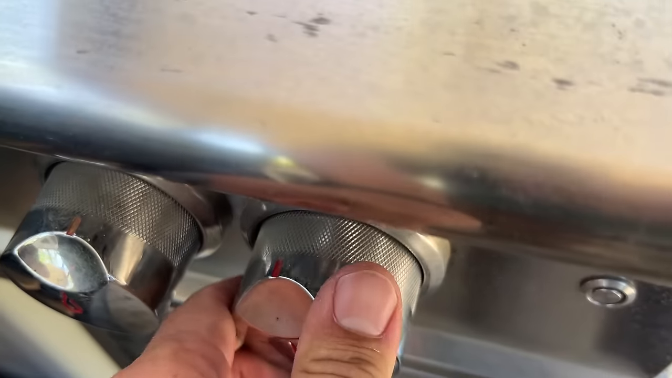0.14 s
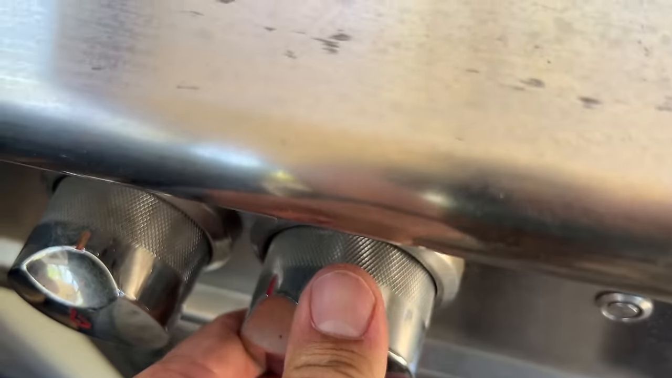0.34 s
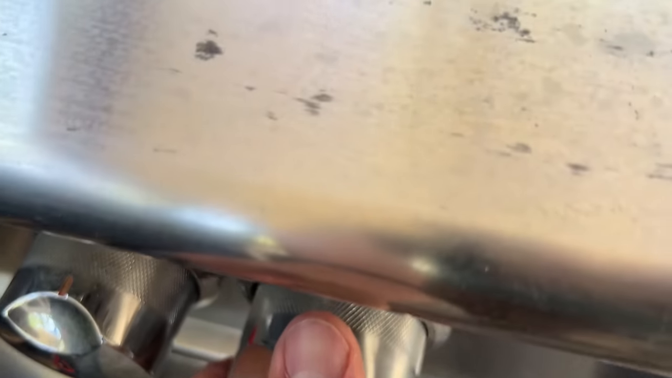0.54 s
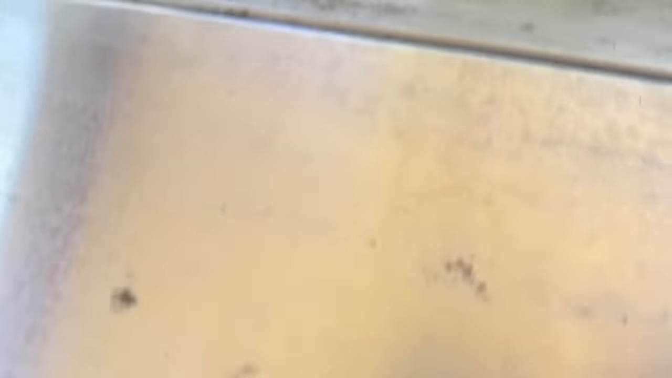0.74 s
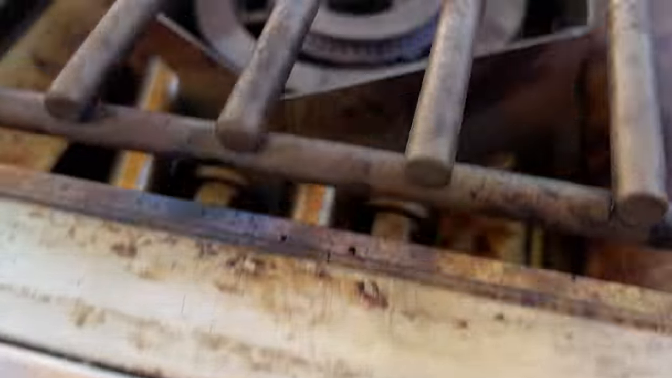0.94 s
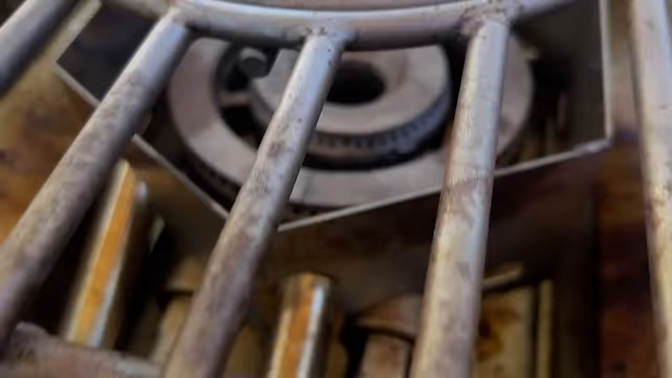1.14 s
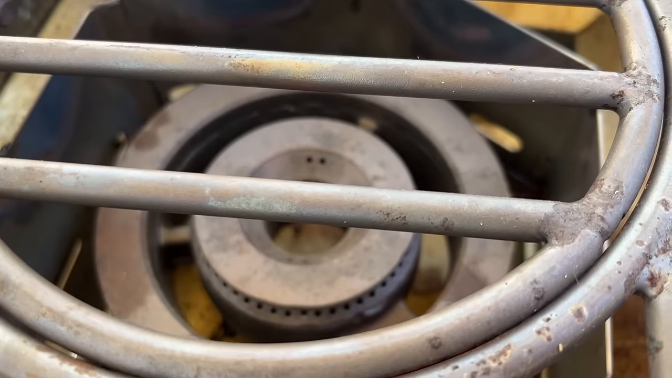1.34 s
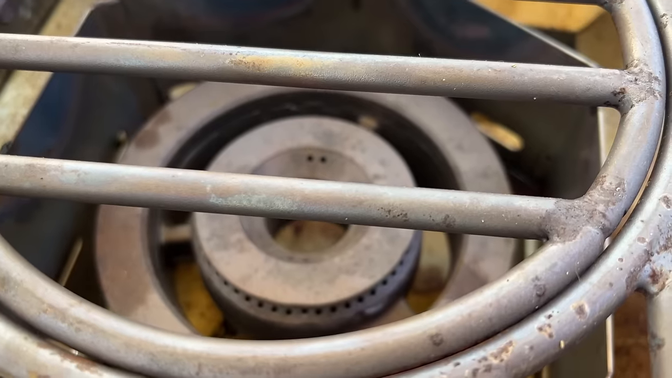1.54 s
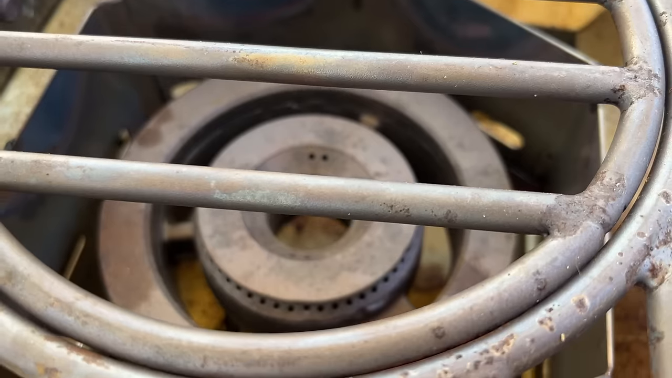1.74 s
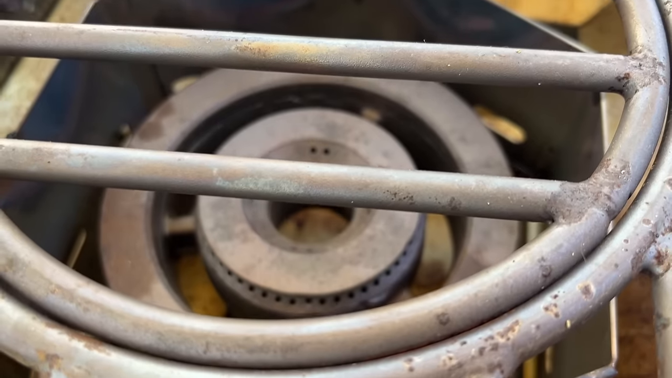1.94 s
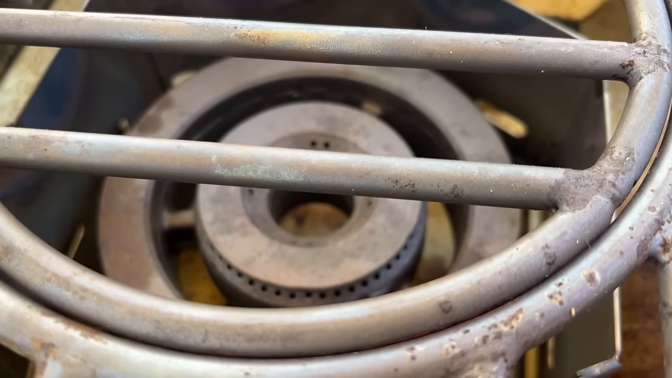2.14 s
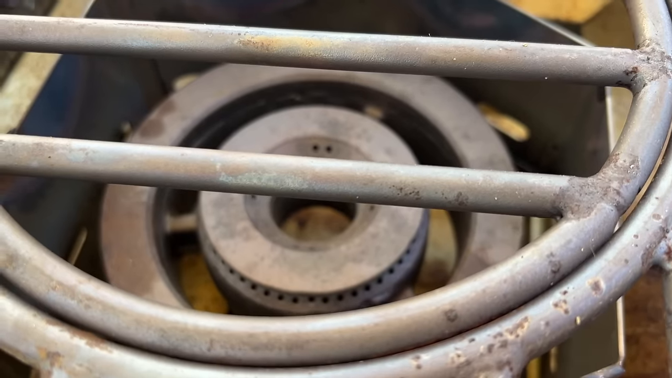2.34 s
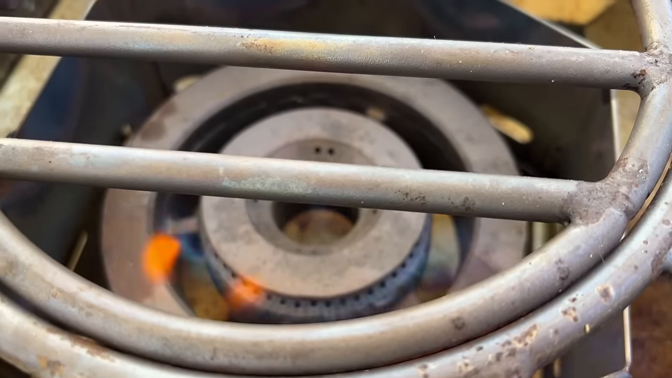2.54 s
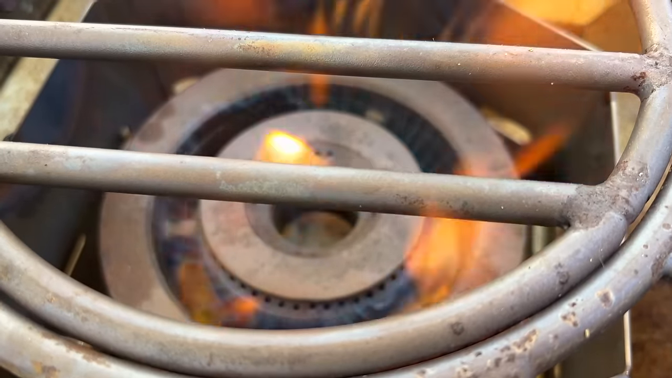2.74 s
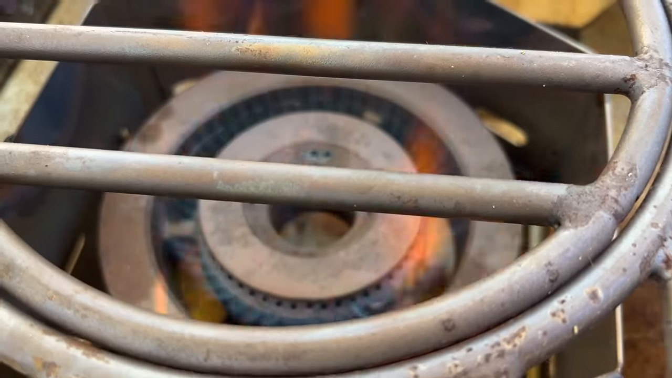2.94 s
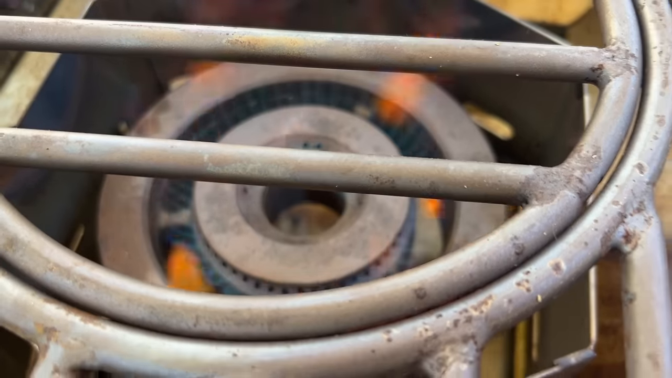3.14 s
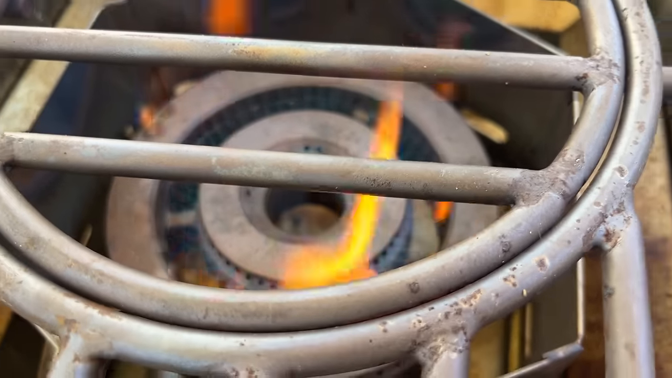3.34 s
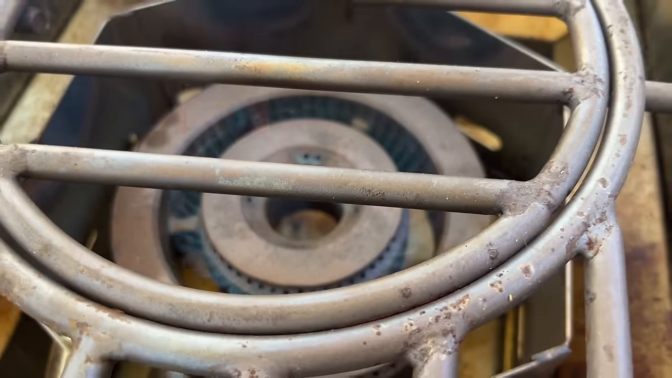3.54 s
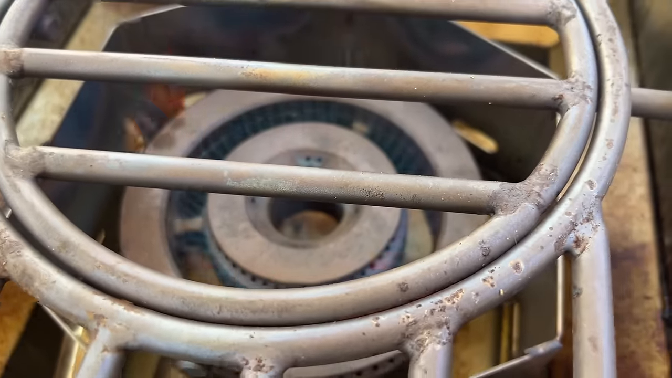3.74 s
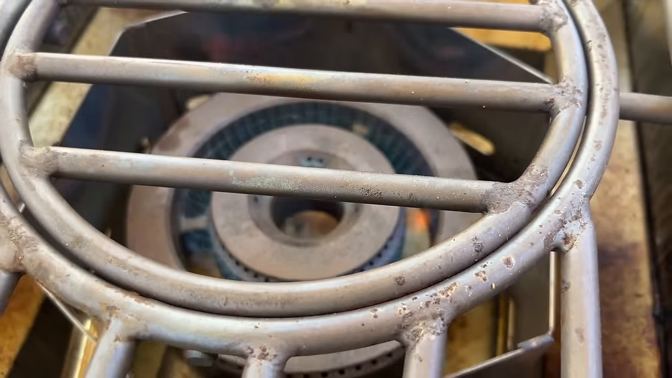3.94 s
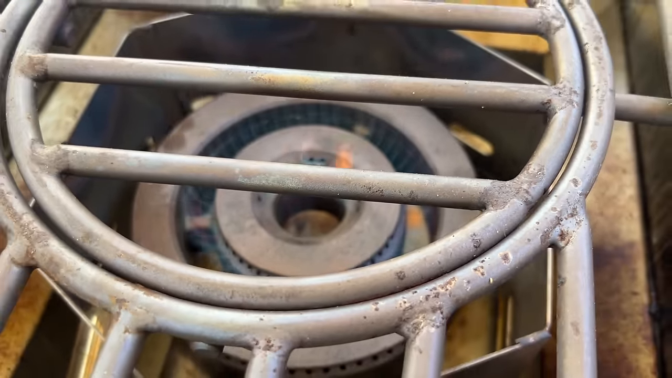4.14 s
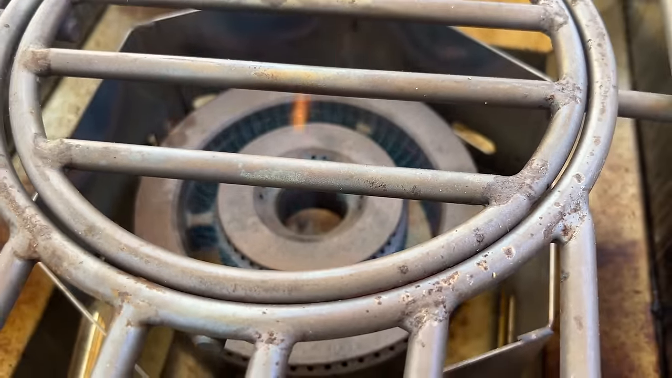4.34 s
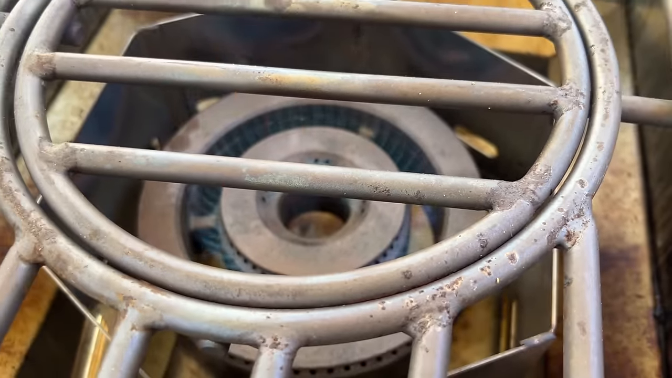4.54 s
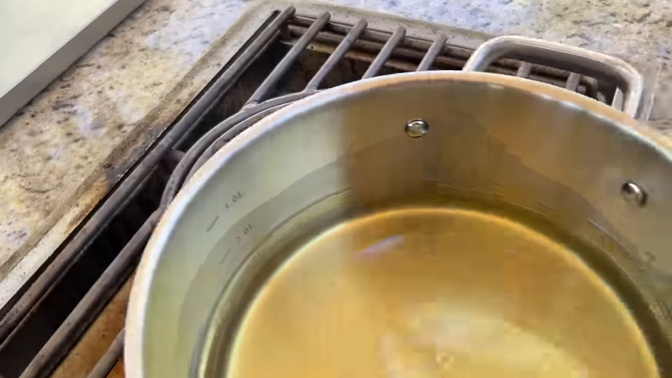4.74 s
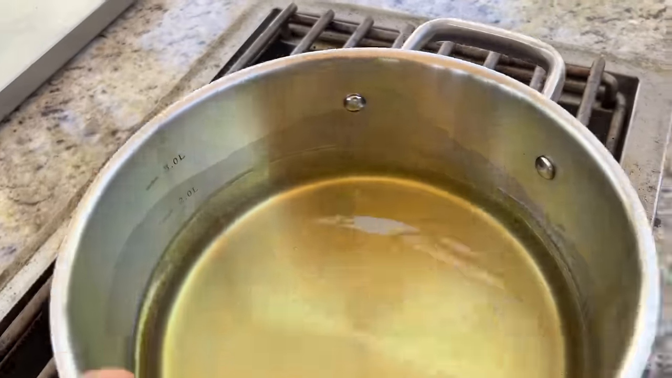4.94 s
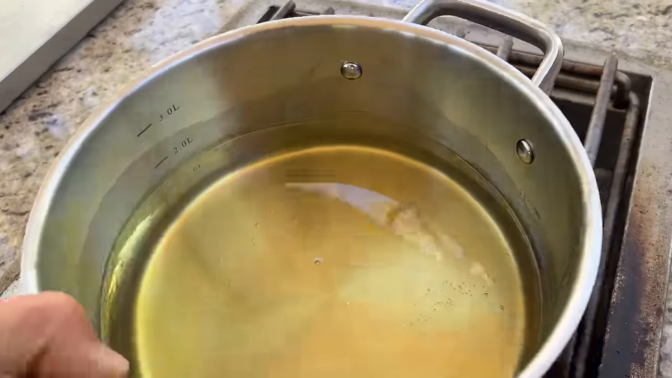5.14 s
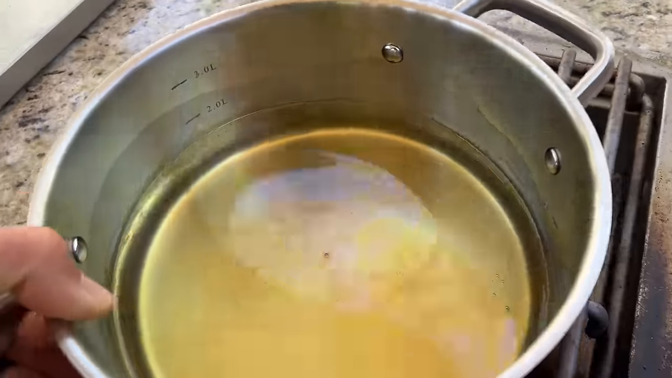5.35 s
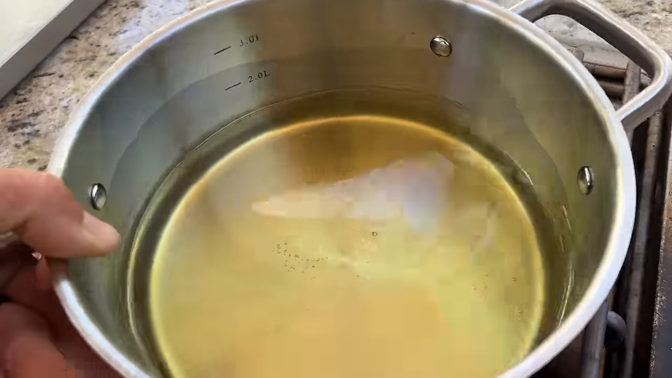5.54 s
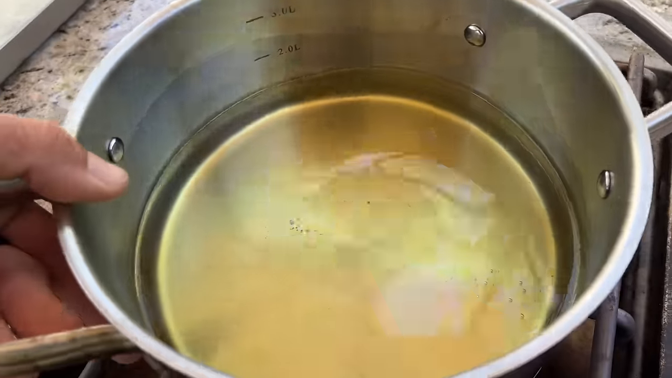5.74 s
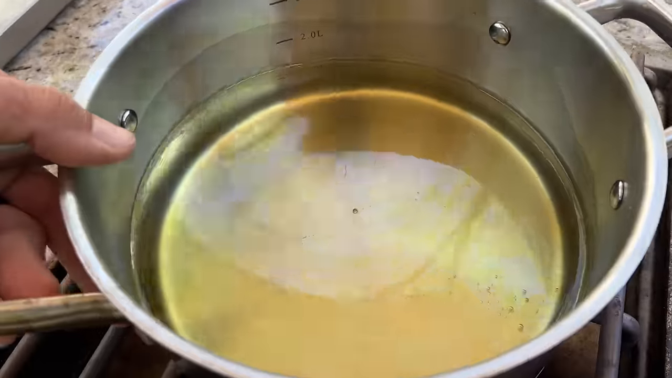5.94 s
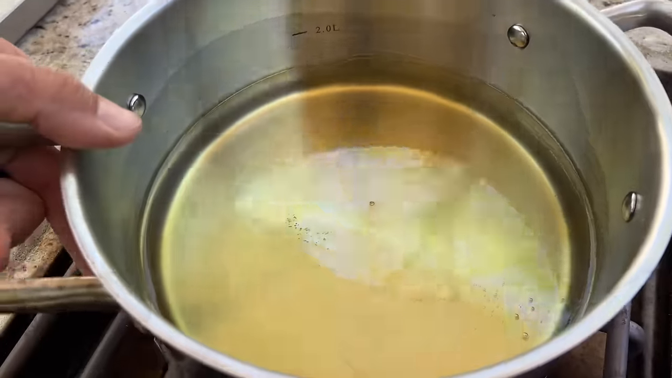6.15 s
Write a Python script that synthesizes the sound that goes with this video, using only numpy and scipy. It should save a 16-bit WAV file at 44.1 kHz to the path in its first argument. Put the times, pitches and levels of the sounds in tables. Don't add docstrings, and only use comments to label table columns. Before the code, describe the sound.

Stereo phone microphones sit near a steel grill in a quiet yard. Soft knob taps give way to thin valve hiss, firm panel knocks and spring clicks. The igniter cracks, pooled gas goes off in a double whoomp, and a low uneven flame roar follows with small puffs. Then a pot hits the grate twice, drags grittily with short metallic squeals, and rests above the burning gas.

```python
import sys
import numpy as np
from scipy import signal
from scipy.fft import rfft, irfft, next_fast_len
from scipy.io import wavfile
from scipy.ndimage import uniform_filter1d, map_coordinates

SR = 44100
rng = np.random.default_rng(int(sys.argv[2]) if len(sys.argv) > 2 else 0)


def transcribe(u):
    v = np.clip(np.atleast_2d(u).T, -1, 1)
    q = np.round(v * 32767).astype(np.int16)
    wavfile.write(sys.argv[1], SR, q)


def linear_from_db(decibels):
    return 10 ** (np.asarray(decibels, float) / 20)


N = 273711

# frequency in Hz, level in dB.
HISS = [(1000, -10), (2500, 0), (4500, -1.5), (7000, -7), (9000, -9.5), (12000, -15), (15600, -29),
        (16300, -49)]
COVERED_S = (4.9, 5.1)


def unit(x):
    return x / np.sqrt(np.mean(x ** 2) + 1e-20)


def along(points, hz):
    f, v = np.transpose(points)
    return np.interp(np.log(hz + 1), np.log(f + 1), v)


def curve(rows):
    s, value = np.transpose(rows)
    return np.interp(np.arange(N) / SR, s, value)


def ramp(span):
    return np.interp(np.arange(N) / SR, span, (0, 1))


def gate(start, end, fade):
    t = np.arange(N) / SR
    return np.clip(np.minimum(t - start, end - t) / fade, 0, 1)


def swells(rows):
    t = np.arange(0, N / SR + .001, .001)
    power = 0
    for s, db, rise, fall in rows:
        power = power + linear_from_db(2 * (db - np.maximum(rise * (s - t), fall * (t - s))))
    return np.interp(np.arange(N) / SR, t, power)


def wobble(rate, size=N):
    knots = rng.standard_normal(int(N * rate / SR) + 4)
    return map_coordinates(knots, [np.arange(size) * rate / SR])


def filtered(x, response):
    n = x.shape[-1]
    m = next_fast_len(n + 4096)
    return irfft(rfft(x, m) * response(np.fft.rfftfreq(m, 1 / SR)), m)[..., :n]


def resonance(f, hz, width_hz):
    return 1j * f * width_hz / (hz * hz - f * f + 1j * f * width_hz)


def touched(f, modes, width_hz, spread):
    return sum((-1) ** k * linear_from_db(level) * resonance(f, hz, width_hz + spread * hz)
               for k, (hz, level, _) in enumerate(modes))


def rush(response, patchy_db):
    z = signal.stft(rng.standard_normal((2, N)), nperseg=512)[2]
    field = uniform_filter1d(rng.standard_normal(z.shape[1:]), size=5, axis=0)
    field = unit(uniform_filter1d(field, size=8, axis=1))
    noise = signal.istft(z * linear_from_db(patchy_db * field), nperseg=512)[1][:, :N]
    return unit(filtered(noise, response))


def blows(hits, modes, damped_hz, spread, kick, floor_hz):
    out, t = np.zeros((2, N + SR)), np.arange(SR // 3) / SR

    def early(x):
        return x / np.sqrt(np.mean(x[:, :SR // 50] ** 2))

    for s, db, top_hz, rattle, ring_db in hits:
        low_hz = floor_hz * (top_hz / 1000) ** 0.29

        def contact(f):
            return (1j * f / low_hz / (1 + 1j * f / low_hz)) ** 2 / (1 + 1j * f / top_hz) ** 3

        noise = rng.standard_normal((2, len(t)))
        force = noise * (linear_from_db(-330 * t) / (1 + (t / rattle) ** 10) + 0.8 * linear_from_db(-60 * t / 0.12))
        force[:, 0] = kick
        rumble = filtered(.5 * noise[::-1] * linear_from_db(-60 * t / 0.62), lambda f: 1 / (1 + 1j * f / 700) ** 2)
        ring = 0
        for k, (hz, level, t60) in enumerate(modes):
            strength_db = level + rng.normal(0, 3, (2, 1))
            ring = ring + (-1) ** k * linear_from_db(strength_db - 60 * t / t60) * np.sin(2 * np.pi * hz * t)
        ring = signal.fftconvolve(noise * linear_from_db(-60 * t / 0.068), ring, axes=1)[:, :len(t)]
        held = filtered(force + rumble, lambda f: touched(f, modes, damped_hz, spread) * contact(f))
        sound = early(held) + linear_from_db(ring_db) * early(filtered(ring, contact))
        out[:, round(s * SR):][:, :len(t)] += linear_from_db(db) * sound
    return out[:, :N]


def whistles(rows, width_hz, fade, steady, dies=0):
    out, t = np.zeros((2, N)), np.arange(SR * 2 // 3) / SR
    for start, end, hz, db in rows:
        part = slice(round(start * SR), round(start * SR) + len(t))
        line = filtered(rng.standard_normal((2, len(t))), lambda f: resonance(f, hz, width_hz) ** 2)
        line = line / np.abs(signal.hilbert(line)) ** steady
        out[:, part] += linear_from_db(db - dies * t) * gate(start, end, fade)[part] * unit(line)
    return out


def yard():
    # frequency in Hz, level in dB.
    hum_colour = [(30, -27), (60, -6), (200, -2), (600, -1.5), (1200, -2.5), (2200, -8), (3500, -16),
                  (6000, -41)]
    # peak in seconds, level in dB, rise in dB/s, fall in dB/s.
    mutter = [
        (0.0, -47, 100, 33),
        (1.7, -40, 50, 104),
        (1.91, -47.5, 60, 63),
    ]
    # peak in seconds, level in dB, rise in dB/s, fall in dB/s.
    handling = [
        (0.0, -48, 100, 56),
        (0.25, -59, 20, 80),
        (1.05, -65, 40, 25),
        (1.8, -52, 50, 52),
        (2.63, -44, 130, 23),
        (4.96, -41, 220, 17),
        (5.8, -50, 33, 60),
        (6.2, -48, 70, 48),
    ]
    sinking = ramp((1.1, 1.56))
    level = np.sqrt(linear_from_db(2 * (-44.5 - 2 * sinking)) + swells(mutter))
    hum = level * linear_from_db(2 + 0.66 * wobble(6.26)) * rush(lambda f: linear_from_db(along(hum_colour, f)), patchy_db=1.44)

    pot_released = gate(5.42, 7, 0.074)
    held = swells(handling[:-2]) * (1 - pot_released) + swells(handling[-2:])
    warm_air = linear_from_db(2 * -56.5) * (gate(2.7, 4.5, .2) + ramp(COVERED_S))
    shake = np.sqrt(linear_from_db(2 * -79) + held + warm_air)
    rumble = shake * linear_from_db(1.5) * rush(lambda f: resonance(f, 58, 61) ** 3, patchy_db=-1.5)

    raw_gas = ramp((1.88, 2.39))
    hiss_db = -52 - 2 * sinking + 4 * raw_gas
    hiss = linear_from_db(hiss_db + 0.5 + 0.59 * wobble(6.14)) * rush(lambda f: linear_from_db(along(HISS, f)), patchy_db=3.0)
    return hum + rumble + hiss


def knob():
    # start in seconds, level in dB, contact top in Hz, rattle in seconds, relative ring-on in dB.
    knocks = [
        (.002, -33.5, 860, 0.035, -2),
        (.065, -40, 600, 0.037, -6),
        (1.4245, -29, 1810, 0.011, -7.5),
        (1.524, -31.5, 222, .03, -4.5),
        (1.62, -11, 2160, 0.021, -14),
        (1.7955, -25.5, 780, 0.016, -5.5),
    ]
    # frequency in Hz, level in dB, t60 in seconds.
    panel = [(172.6, -9, 0.98), (220.6, -8, 0.65), (290.4, -7, 0.82), (342, -3, 0.38), (443, -10, 0.19),
             (600, -5.5, 0.32), (774, -2, 0.13), (824, 1, 0.11), (970, -6, 0.22), (1165, -10.5, 0.26),
             (1575, -9, 0.17), (1935, -8.5, 0.2), (2350, -14.5, 0.14), (2690, -9.5, 0.16), (3280, -10, .08),
             (3580, -10, .08), (4840, -18, .15)]
    # start in seconds, end in seconds, frequency in Hz, level in dB.
    panel_hum = [
        (1.66, 1.8, 1935, -45.5),
    ]
    struck = blows(knocks, panel, damped_hz=67.4, spread=0.04, kick=17.8, floor_hz=287)
    return struck + whistles(panel_hum, width_hz=40, fade=.02, steady=.6, dies=30)


def valve():
    # start in seconds, end in seconds, frequency in Hz, level in dB.
    leak = [
        (0.81, 1.2, 4400, -58),
    ]
    jet = [
        (1.1, 1.37, 9300, -60),
        (2.13, 1.9, 11000, -59),
        (2.75, 2.9, 7550, -61.5),
    ]
    return whistles(jet, width_hz=59, fade=.03, steady=0.51) + whistles(leak, width_hz=590, fade=.08, steady=0)


def igniter():
    # peak in seconds, level in dB, rise in seconds, lowest Hz, highest Hz.
    snaps = [
        (1.388, -50, 0.0056, 3020, 8900),
        (1.4712, -16.5, 0.00035, 3380, 17000),
        (1.622, -31, .001, 2980, 7000),
        (1.797, -49, .002, 3000, 15000),
        (1.898, -41, 0.0036, 1490, 6800),
        (2.413, -15.5, 0.0026, 2500, 17000),
        (4.69, -47, .01, 6000, 16000),
        (4.85, -46.5, 0.018, 8000, 16000),
    ]
    # start in seconds, level in dB, contact top in Hz, rattle in seconds, relative ring-on in dB.
    striker = [
        (2.4055, -27, 4500, 0.0091, -11),
        (2.4125, -15, 7000, 0.034, -8),
    ]
    # frequency in Hz, level in dB, t60 in seconds.
    housing = [(638, -4, .08), (915, -4.5, .1), (1120, -5.5, 0.18), (1617, -0.5, 0.15), (1970, -5, 0.19),
               (2220, -10, 0.08), (2590, -4, .08), (3140, -3.5, .08), (3550, -8, 0.07),
               (4400, -13.5, 0.095), (5800, -25, 0.11)]
    lead_s = .05
    out, t = np.zeros((2, N)), np.arange(SR // 2) / SR - lead_s
    for s, db, rise, low_hz, high_hz in snaps:
        t60 = 0.065 * (1 + (rise / .006) ** 2)
        onset = np.exp(np.minimum(t, 0) / rise)
        decay = 0.8 * linear_from_db(-60 * t / t60) + 0.11 * linear_from_db(-25 * t / t60)
        shape = np.where(t < 0, onset, decay)

        def band(f):
            return (1j * f / low_hz / (1 + 1j * f / low_hz)) ** 3 / (1 + 1j * f / high_hz) ** 2

        burst = unit(filtered(rng.standard_normal((2, len(t))), band))
        out[:, round((s - lead_s) * SR):][:, :len(t)] += linear_from_db(db) * shape * burst
    return out + blows(striker, housing, damped_hz=80, spread=0.06, kick=3.6, floor_hz=280)


def flame():
    # time in seconds, level in dB.
    burn = [(2.65, -36), (2.76, -30), (3.0, -34), (3.13, -31), (3.38, -35), (4.21, -31), (4.49, -28.5),
            (4.9, -34.5), (5.3, -31.5), (5.62, -24.5), (5.78, -27), (6.0, -31.5)]
    # frequency in Hz, level in dB.
    roar_colour = [(30, -39), (60, -15.5), (150, -2.5), (270, 2.5), (380, -8), (520, -5.5), (800, -10.5),
                   (1200, -20), (1800, -23.5), (3000, -54)]
    # frequency in Hz, width in Hz, level in dB.
    throat_modes = [(1206, 250, 1), (2017, 84, 3.5), (2296, 170, -1.5), (2800, 280, -4.5),
                    (3530, 250, -12.5)]
    # peak in seconds, level in dB, rise in dB/s, fall in dB/s.
    whoomps = [
        (2.466, -20, 270, 137),
        (2.58, -24.5, 700, 200),
    ]
    # peak in seconds, level in dB, rise in dB/s, fall in dB/s.
    afterglow = (2.5, -43, 0, 23)
    burn_db = curve(burn)
    opened = ramp((3.5, 3.85))
    front = swells([(2.44, 0, 0, 230)])
    flutter = wobble(28)

    roar_gain = np.sqrt(linear_from_db(2 * burn_db) + swells(whoomps))
    roar = rush(lambda f: linear_from_db(along(roar_colour, f)), patchy_db=.6)
    roar = unit(linear_from_db(1.4 * flutter + 1.4 * wobble(90)) * roar)

    def pipe(f):
        return sum((-1) ** k * linear_from_db(db) * resonance(f, hz, w) for k, (hz, w, db) in enumerate(throat_modes))

    throat_db = np.interp(opened, (0, 1), (-48.5, -44)) + 0.22 * (burn_db - burn_db.mean())
    throat_gain = np.sqrt(linear_from_db(2 * throat_db) + linear_from_db(2 * -25) * front + swells([afterglow]))
    free, lifted = rush(lambda f: np.array([[pipe(f)], [pipe(f / 1.22)]]), patchy_db=2.7)
    near = gate(4.6, 5.05, .12)
    throat = np.sqrt(1 - near) * free + np.sqrt(near) * lifted

    def nozzle(f):
        return linear_from_db(along(HISS, f)) * (1 + 2.0 * resonance(f, 4810, 230) + 1.1 * resonance(f, 7960, 400))

    hiss_db = np.interp(opened, (0, 1), (-70, -54)) + 5 * ramp(COVERED_S)
    hiss_gain = np.sqrt(linear_from_db(2 * hiss_db) + linear_from_db(2 * -32) * front)
    jets = rush(nozzle, patchy_db=-3.5)

    body = roar_gain * linear_from_db(1.5) * roar
    body = body + throat_gain * linear_from_db(2.5 + 2.0 * flutter) * throat
    body = body + hiss_gain * linear_from_db(0.32 * wobble(12)) * jets
    return gate(2.425, 7, 0.005) * body


def pops():
    # start in seconds, level in dB, start in Hz, end in Hz, length in seconds.
    pockets = [
        (2.448, -21, 734, 568, 0.026),
        (2.455, -14.5, 329, 240, 0.031),
        (2.463, -13.5, 197, 53.5, 0.025),
        (2.478, -20.5, 90, 45, 0.044),
        (2.569, -9.5, 348, 90.5, 0.0159),
        (2.58, -24.5, 110, 45, 0.032),
    ]
    # time in seconds, peak in dB.
    puffs = [
        (2.544, -27),
        (2.656, -30),
        (2.711, -27.5),
        (3.257, -34),
        (4.076, -23),
        (4.388, -32),
        (5.824, -28),
    ]
    out = np.zeros((2, N))
    licks = [(s - .001, db + 2.5, 900, 420, .005) for s, db in puffs]
    for s, db, start_hz, end_hz, length in pockets + licks:
        u = np.arange(round(3 / 2 * length * SR)) / (length * SR)
        uneven = 1 + 0.1 * wobble(149, size=len(u))
        turns = np.cumsum(uneven * start_hz * (end_hz / start_hz) ** np.minimum(u, 1)) / SR
        swell = np.sin(np.pi * (u * 2 / 3) ** .7) ** 2
        out[0, round(s * SR):][:len(u)] += linear_from_db(db) * swell * np.sin(2 * np.pi * turns)
    return out


def pot():
    # start in seconds, level in dB, contact top in Hz, rattle in seconds, relative ring-on in dB.
    landing = [
        (4.9285, -11.5, 4500, .02, -6.5),
        (4.977, -13.5, 5670, 0.024, -6),
        (5.218, -30.5, 5000, 0.018, 4.5),
    ]
    # frequency in Hz, level in dB, t60 in seconds.
    pot_modes = [(298, 1.5, 0.58), (444, 2.5, 0.13), (545, 1, 0.14), (648, 4.5, 0.22), (757, 3, 0.2),
                 (940, 0, 0.082), (1210, -2.5, 0.17), (1577, -0.5, 0.47), (1820, -16, 0.14),
                 (1877, -8, 0.4), (2220, -11, 0.28), (2380, -13, 0.3), (2700, -13, 0.14), (2990, -9.5, .2),
                 (3250, -10, 0.29), (3880, -5, 0.25), (4100, -6, 0.23), (4390, -3.5, 0.15),
                 (5500, -12, 0.22), (6240, -12, .15), (7160, -15.5, .15), (7940, -12, .15)]
    # time in seconds, level in dB.
    slide = [
        (4.94, -17),
        (5.04, -22.5),
        (5.093, -15.5),
        (5.18, -27.5),
        (5.228, -23),
        (5.28, -35.5),
        (5.4, -27.5),
        (5.5, -32.5),
        (5.85, -41),
    ]
    # start in seconds, end in seconds, Hz, level in dB.
    singing = [(5.06, 5.25, 3802, -31), (4.925, 4.965, 4338, -24), (5.1, 5.2, 1214, -25.5),
               (4.925, 5.0, 1556, -18), (5.03, 5.25, 1554, -32), (5.32, 5.46, 730, -22),
               (4.984, 5.021, 2278, -27), (5.06, 5.15, 2432, -29.5), (5.16, 5.28, 2432, -33.5),
               (5.265, 5.355, 1216, -28.5), (5.028, 5.101, 4401, -35), (4.97, 5.09, 185, -28)]
    # start in seconds, end in seconds, Hz, level in dB.
    linger = [
        (5.29, 5.51, 4402, -49),
        (5.44, 5.86, 5702, -55),
        (5.29, 5.96, 3902, -50.5),
        (5.05, 5.7, 7502, -53.5),
    ]
    drag_db = curve(slide)
    settled_s = np.arange(N) / SR - slide[1][0]
    grit_db = -26.5 + 0.35 * drag_db - 15.7 * settled_s
    touch = slice(round(slide[0][0] * SR) - SR // 20, N)
    grains = (linear_from_db(2.5 * wobble(70) + 2.5 * wobble(400)) * rng.standard_normal((2, N)))[:, touch]

    def dark(f):
        return (touched(f, pot_modes, 60, 0.016) + .12) / (1 + (f / 2900) ** 8)

    def bright(f):
        scrape = .025 + .05 / (1 + (f / 8500) ** 6)
        return (touched(f, pot_modes, 60, 0.016) + scrape) / (1 + (2900 / (f + 1)) ** 8)

    drag, grit = unit(filtered(grains, dark)), unit(filtered(grains, bright))
    out = blows(landing, pot_modes, damped_hz=50, spread=.045, kick=23, floor_hz=150)
    out[:, touch] += gate(4.93, 6.1, 0.058)[touch] * (linear_from_db(drag_db[touch]) * drag + linear_from_db(grit_db[touch]) * grit)
    out = out + whistles(singing, width_hz=34, fade=.018, steady=.5, dies=36)
    return out + whistles(linger, width_hz=60, fade=.04, steady=.2, dies=8)


def ports(pair, likeness, column):
    # frequency in Hz, radians by which right leads for air noise, the same for struck steel.
    lead_rows = [(0, 0, 0), (700, -.5, -.5), (1400, -2.8, -.3), (2000, -6.2, 0), (3000, -8.6, -2.4),
                 (4200, -12.6, -6.3), (5100, -14, -7.7), (5800, -10.6, -5), (7000, -12.5, -6.2),
                 (10200, -9.42, -3.14), (12900, -6.5, -.2), (14600, -5.9, .4), (15700, -3.4, 2.9)]
    # frequency in Hz, level in dB.
    louder_left = [(100, 1), (900, 3), (1900, -1.5), (2400, -2.5), (3500, 0), (5800, 6), (7000, 3),
                   (9000, -0.5)]
    lead = np.transpose(lead_rows)

    def mix(hz):
        alike = np.clip(along(likeness, hz), 0, 1)
        turned = alike * np.exp(1j * np.interp(hz, lead[0], lead[column]))
        paths = np.array([[1 + 0 * hz, 0 * hz], [turned, np.sqrt(1 - alike ** 2)]])
        return paths * linear_from_db(along(louder_left, hz) / 2 * [[[1]], [[-1]]])

    return filtered(pair, mix).sum(axis=1)


def scene():
    # frequency in Hz, likeness from 0 to 1.
    near_likeness = [(100, .99), (400, 1), (800, 0.89), (1500, 0.45), (2000, 0.52), (3700, 0.31),
                     (4500, .6), (6300, 0.16), (7500, 0.99), (9500, 1)]
    far_likeness = [(60, 0.97), (250, 0.93), (500, 0.16), (900, 0.36), (2000, 0.48), (3800, 0.24),
                    (7000, 0.076), (8000, 0.96), (9500, 0.97)]
    far = ports(yard(), far_likeness, column=1)
    steel = ports(knob() + igniter() + pot(), near_likeness, column=2)
    gas = ports(valve() + flame() + pops(), near_likeness, column=1)
    return steel + gas + far


def top_cut(x):
    return signal.sosfilt(signal.butter(12, 16830, fs=SR, output="sos"), x)


def record(dry):
    held = dry / (1 + np.abs(dry / 1.08) ** 6) ** (1 / 6)
    return top_cut(held)


dry = scene()
out = record(dry)
transcribe(out)
```